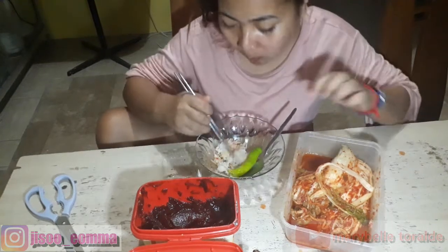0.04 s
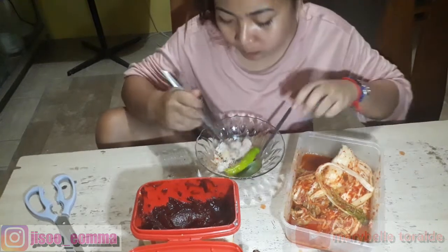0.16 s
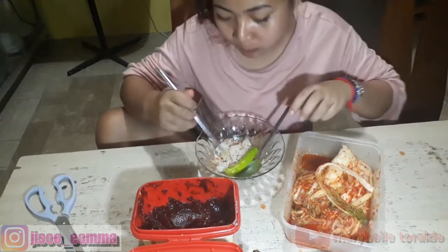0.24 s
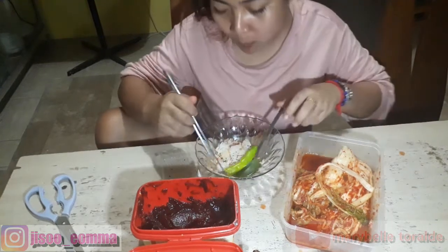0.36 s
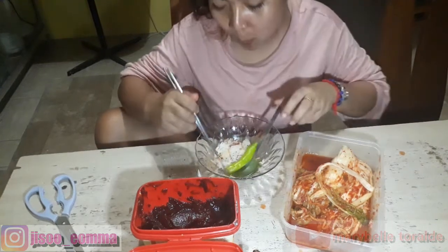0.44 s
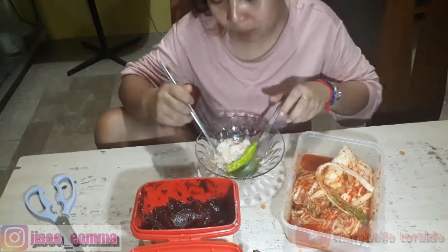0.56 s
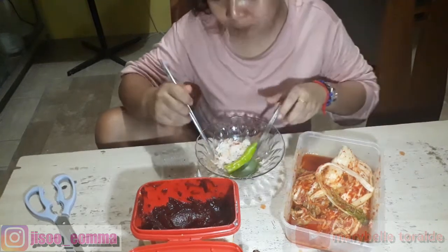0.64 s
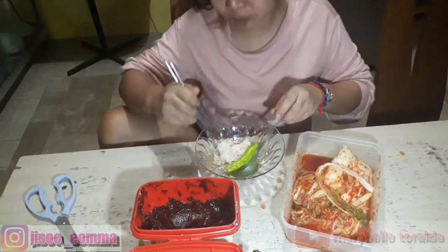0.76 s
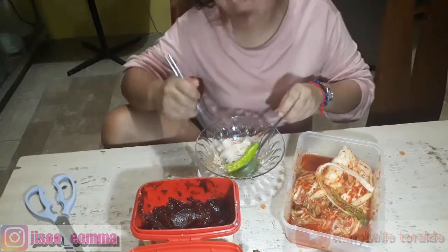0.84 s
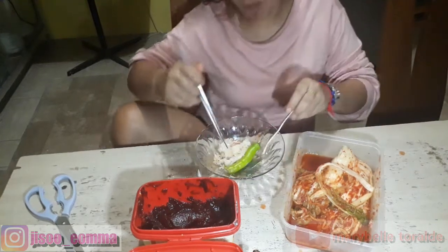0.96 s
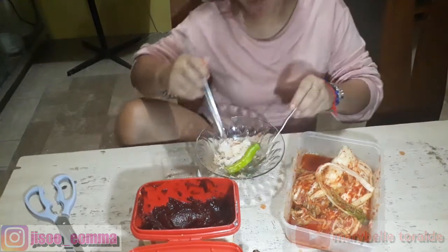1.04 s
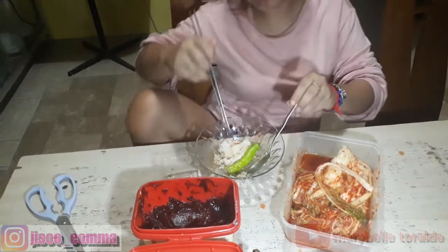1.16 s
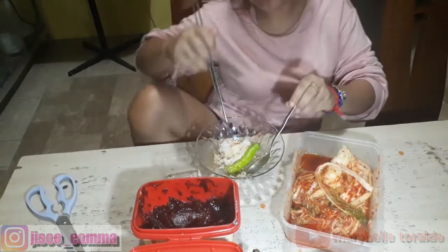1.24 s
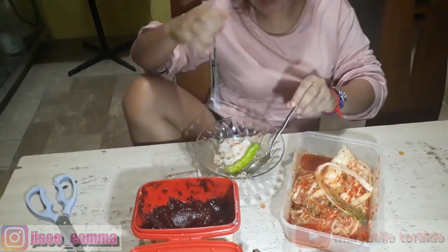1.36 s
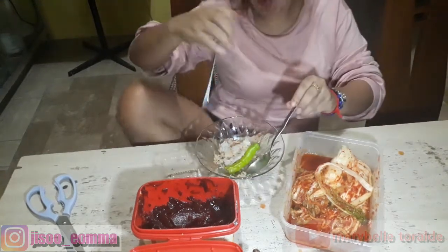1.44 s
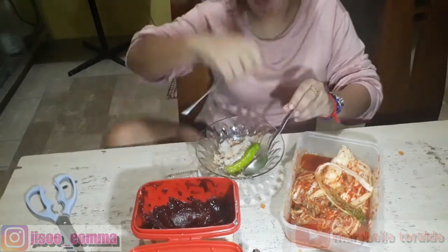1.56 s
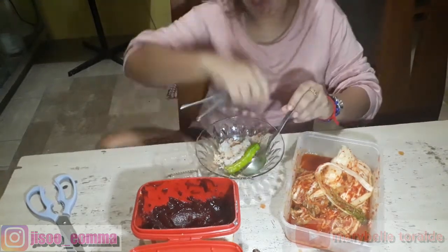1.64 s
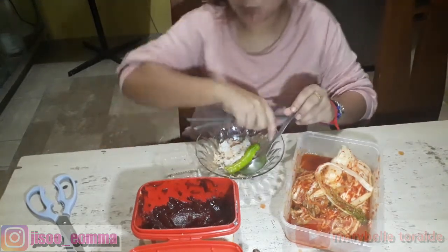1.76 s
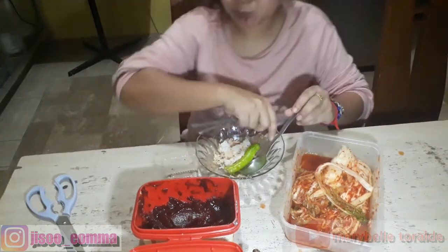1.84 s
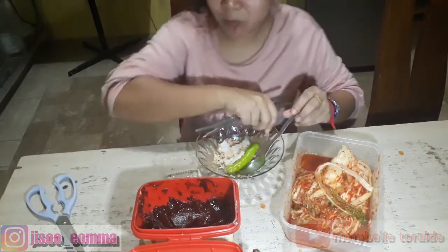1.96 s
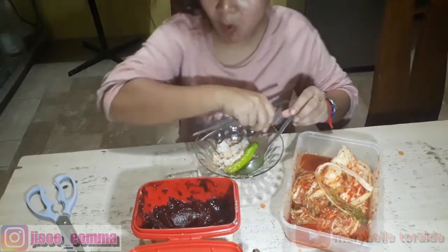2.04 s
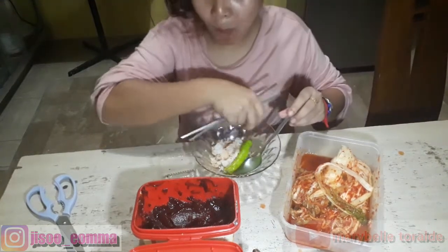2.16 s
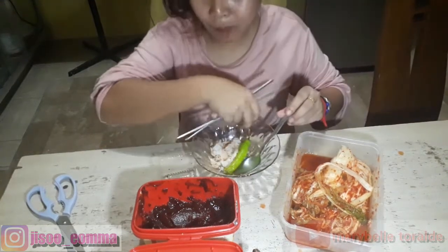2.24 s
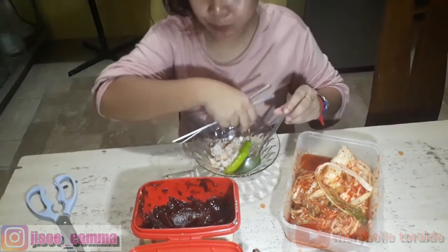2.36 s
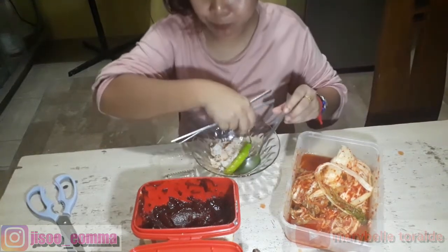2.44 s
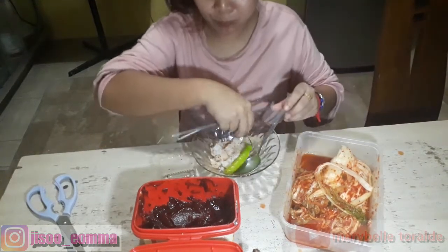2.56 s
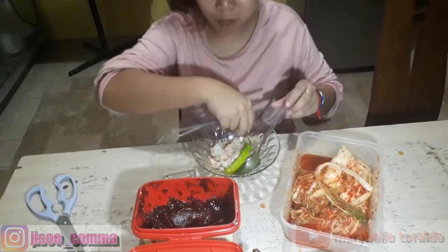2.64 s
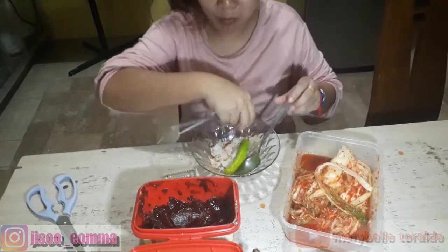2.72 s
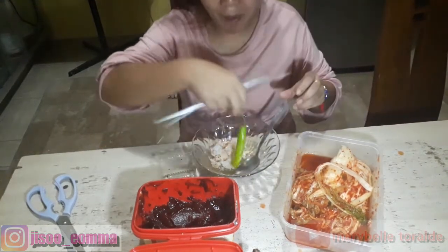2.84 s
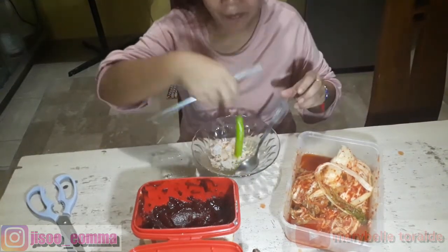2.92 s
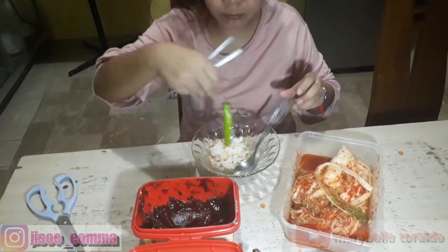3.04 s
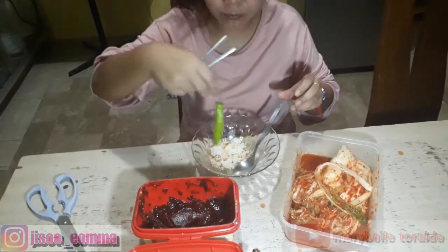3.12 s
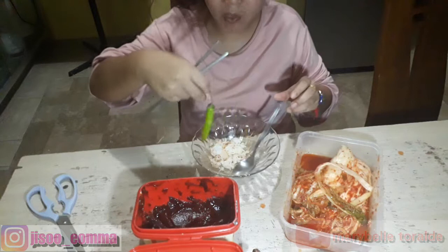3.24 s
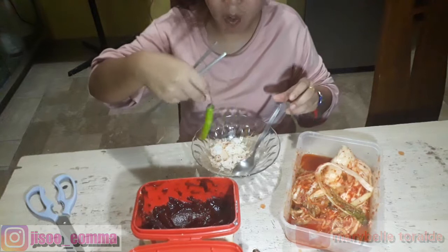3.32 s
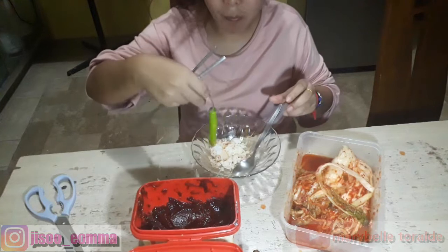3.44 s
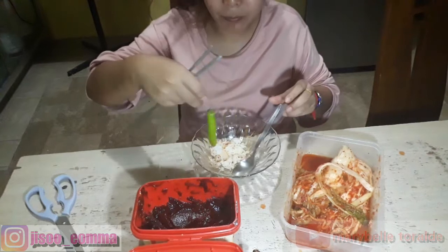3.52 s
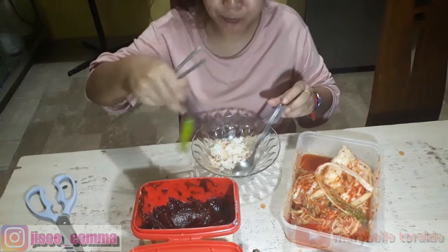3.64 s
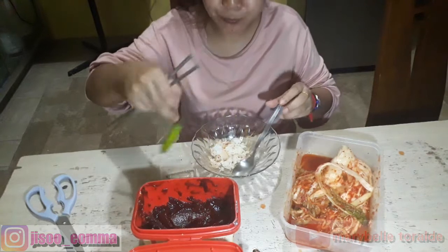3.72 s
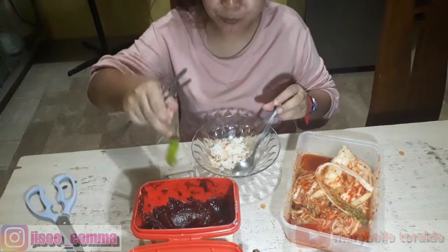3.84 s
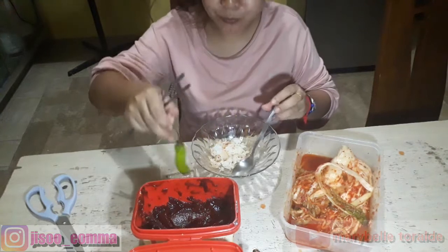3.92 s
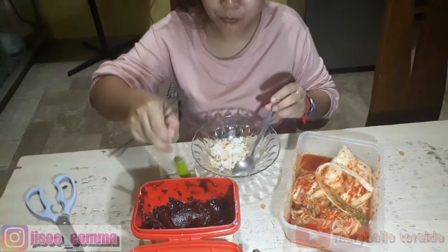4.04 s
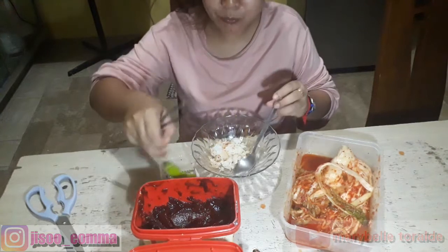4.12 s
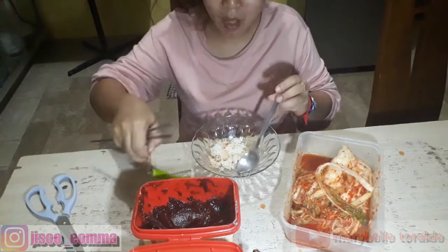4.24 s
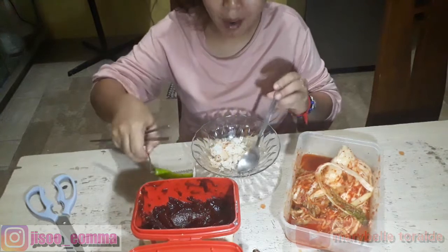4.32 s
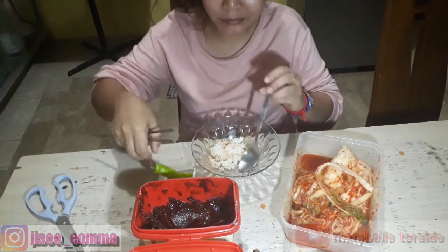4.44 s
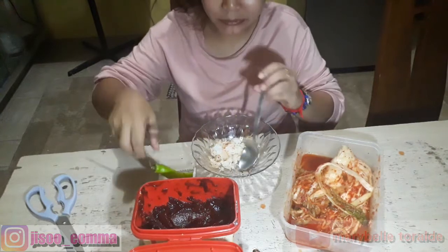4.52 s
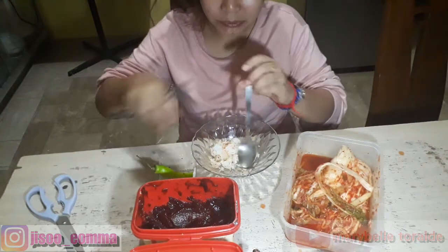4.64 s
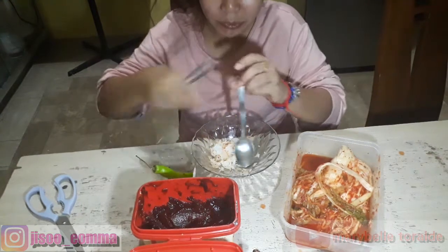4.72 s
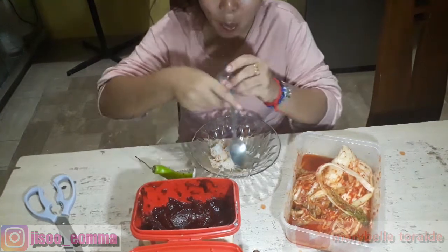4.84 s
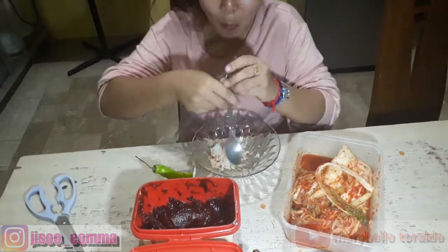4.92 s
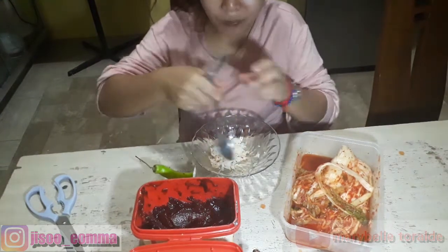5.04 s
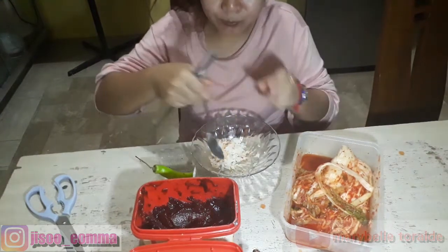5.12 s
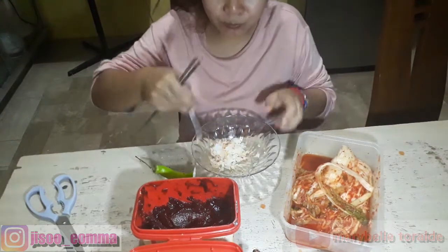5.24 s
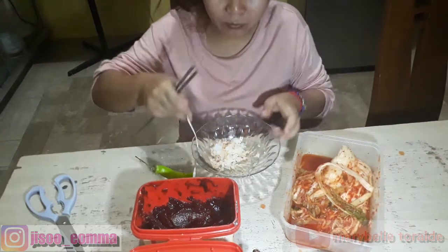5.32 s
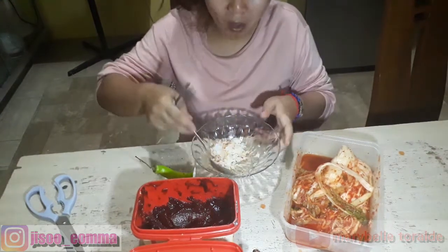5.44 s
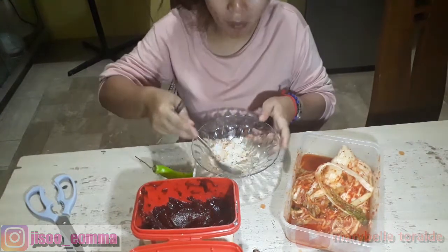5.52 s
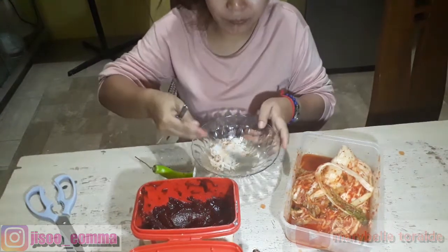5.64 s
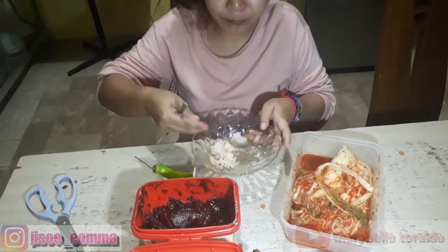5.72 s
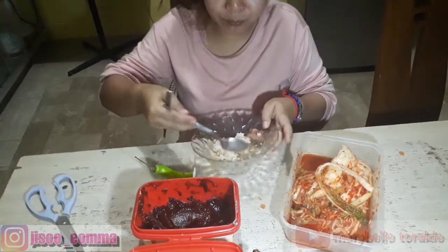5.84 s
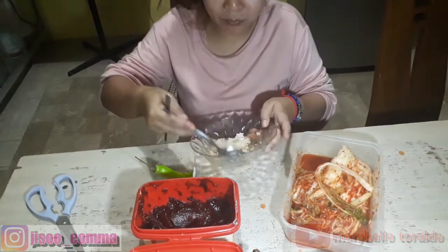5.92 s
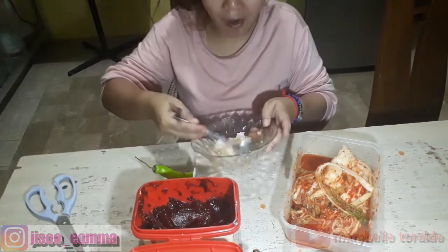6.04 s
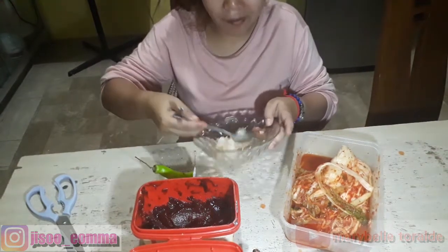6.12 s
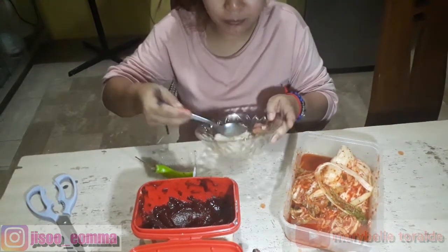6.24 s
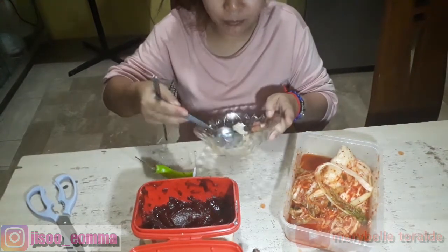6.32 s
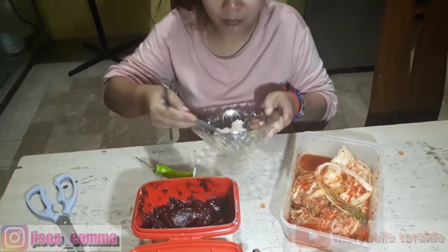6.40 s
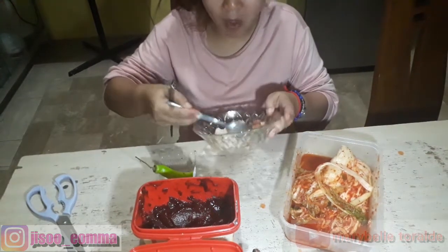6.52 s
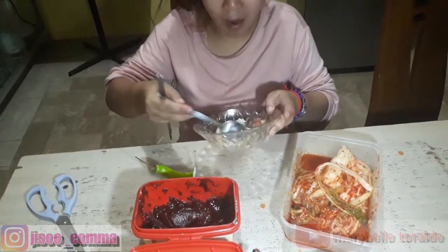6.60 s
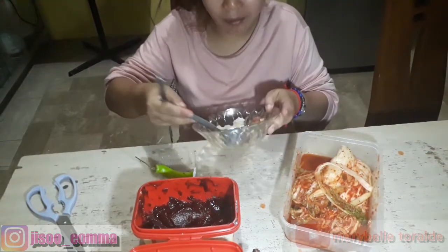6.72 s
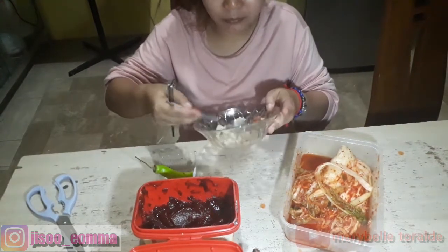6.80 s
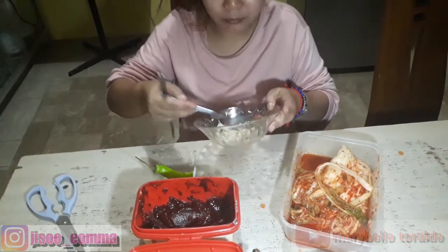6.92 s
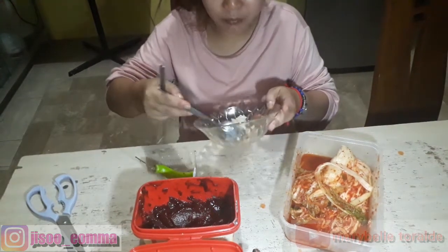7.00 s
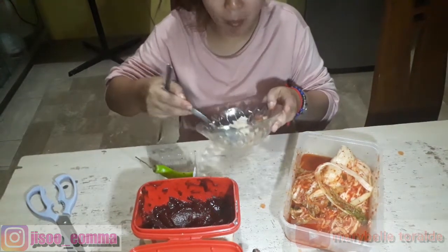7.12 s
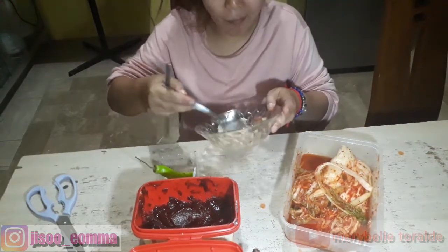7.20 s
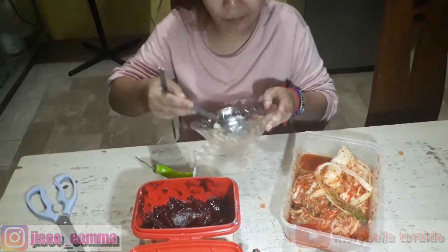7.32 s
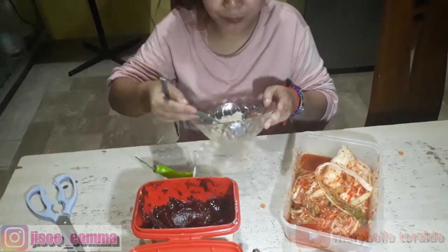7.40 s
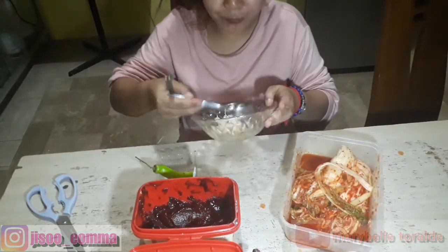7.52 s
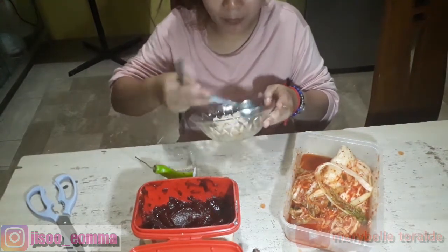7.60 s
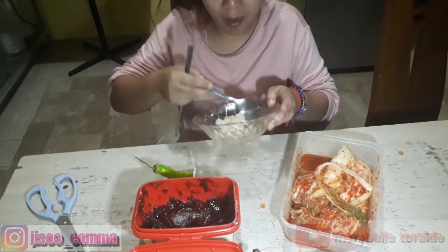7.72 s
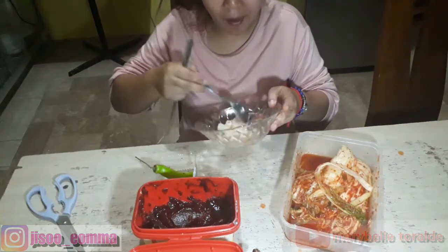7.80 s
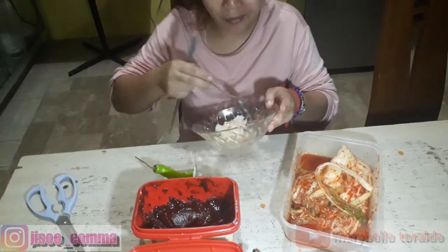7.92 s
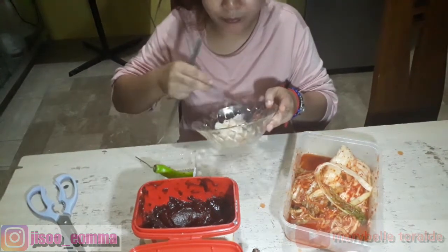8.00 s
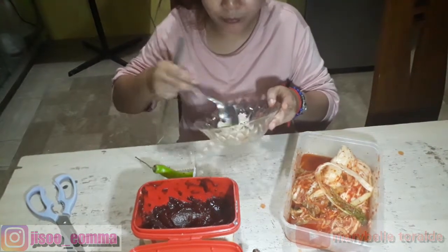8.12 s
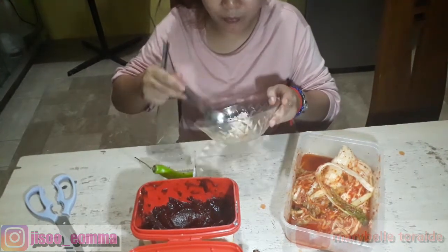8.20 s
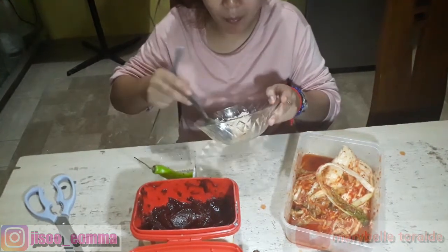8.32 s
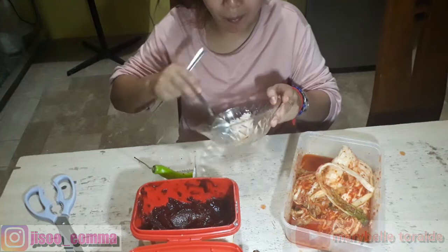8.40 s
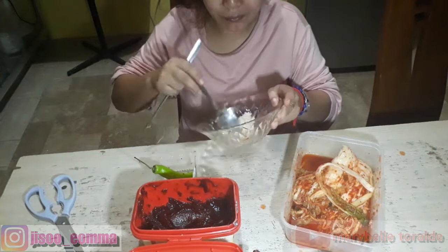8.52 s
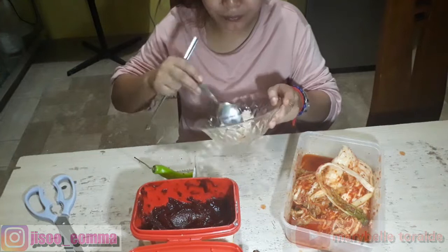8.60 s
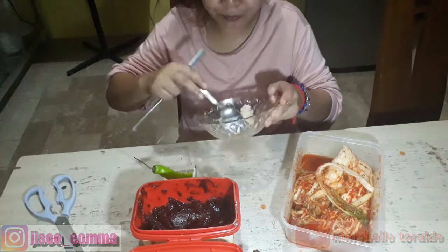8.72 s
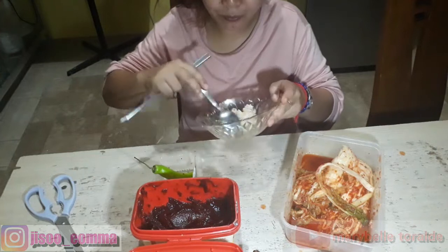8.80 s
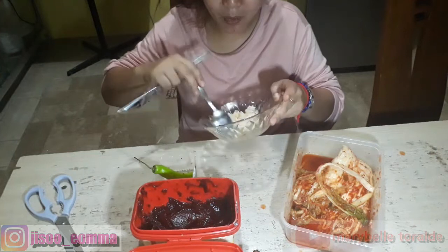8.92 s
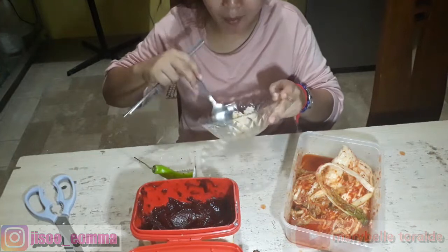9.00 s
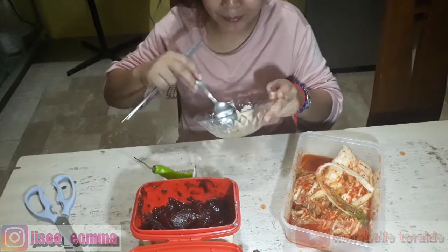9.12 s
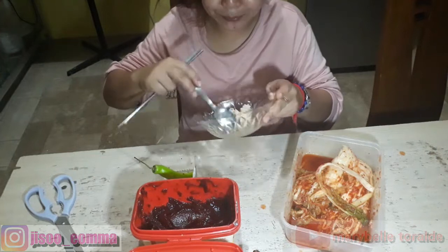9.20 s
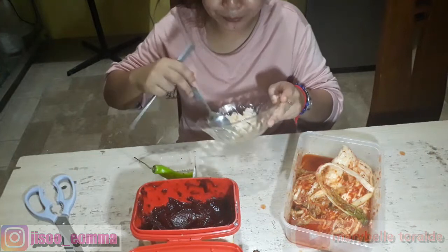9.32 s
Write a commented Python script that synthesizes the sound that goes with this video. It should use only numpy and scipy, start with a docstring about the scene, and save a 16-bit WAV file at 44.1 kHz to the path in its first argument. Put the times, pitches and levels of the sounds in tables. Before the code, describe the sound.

Close mono pickup of a meal in a small echoing room. Bright, damped clinks of steel utensils on glass open the scene, followed by a cluster of dull, grainy crunches and a quiet gap. Things bump down on the table, the glass bowl rings hard once, and spoon drags and taps continue, with one quick squeak late on. Broadband rush, low rumble and faint hum run throughout.

```python
"""Steel chopsticks and a spoon clink, drag and once squeal on a glass bowl, during a meal in a hard-walled room.
Between the clinks food crunches and things scuff on the table top, over a rush, a low rumble and a wavering hum.
Clinks are damped sines fed by short friction bursts; crunches and scuffs are dull grainy bursts with one resonance.
Squeal and whistles are unsteady gliding tones; rush and rumble are coloured noise."""
import sys
import numpy as np
from scipy import signal
from scipy.fft import rfft, irfft, next_fast_len
from scipy.io import wavfile
from scipy.ndimage import map_coordinates

SR = 44100
rng = np.random.default_rng(int(sys.argv[2]) if len(sys.argv) > 2 else 0)


def dump(signal):
    """Clip the signal to [-1, 1] and save it as 16-bit WAV at the path in sys.argv[1]."""
    limited = np.clip(np.atleast_2d(signal).T, -1, 1)
    pcm = np.round(limited * 32767).astype(np.int16)
    wavfile.write(sys.argv[1], SR, pcm)


N = 412335  # samples in the scene
RING = int(.65 * SR)  # samples each contact may ring
BLOW = int(.04 * SR)  # opening samples over which the level of a contact is set
TOP_HZ = 15600  # band limit of the recorder

# Colour of the even rush. Each row: frequency in Hz, relative density in dB per Hz.
RUSH_COLOUR = [(180, -27), (300, -17), (385, -2), (425, -3.5), (462, -4), (885, -5.5), (1030, -6.5),
               (2070, -9.5), (2650, -13.5), (4230, -22.5), (5250, -23), (5800, -26), (9390, -26),
               (15000, -37), (16000, -58)]
# Colour of the low rumble. Each row: frequency in Hz, relative density in dB per Hz.
RUMBLE_COLOUR = [(15, -65), (25, -30), (86, -8), (125, -2), (216, -5.5), (246, -4), (387, -12), (425, -32),
                 (600, -12), (780, -41), (1320, -120)]
# Arms and sleeves move and shift the background.
# Each row: middle in seconds, half length in seconds, rumble rise in dB, rush rise in dB.
MOVES = [(.01, 0.12, 7, 6), (.6, 0.48, 2.5, .5), (1.52, 0.24, -0.5, 6.5), (2.03, 0.19, 1.5, 3),
         (5.513, 0.31, 7, -0.5), (7.63, 0.55, 4.5, 1.5), (9.2, 0.45, 2.5, 0.5)]
# Low hum tones that come and go.
# Each row: start in seconds, end in seconds, mean pitch in Hz, level in dB before waver and hum trim.
HUMS = [(-.4, 2.96, 122, -49.5), (3.5, 11, 113.5, -52), (5.1, 8.4, 134.5, -46.5)]
HUM_FADE_S, HUM_FADE_DB = 0.29, 17

# Echo length of the room. Each row: frequency in Hz, time to lose 60 dB in seconds.
ROOM_DECAY = [(150, 0.32), (1000, 0.6), (4000, 0.5), (9000, 0.41), (15000, 0.32)]

# Modes of each object.
# Each row: frequency in Hz, relative level in dB, time to lose 60 dB in seconds before the sustain factor.
BOWL_MODES = [(650, -10, .09), (1416, -4, .3), (2476, -3, .33), (3735, -11, .28), (5078, -6, .45),
              (6470, -3.5, .26), (8066, -2, .27), (8335, -4, .27), (8430, -5, .25), (9567, -3, .2),
              (9768, -4, .17), (11076, -7, .2), (11400, -7, .2), (12780, -9, .16), (14190, -14, .16)]
SPOON_MODES = [(1085, -15, .12), (1480, -17, .1), (2000, -17, .1), (4700, -11, .25), (4765, -6, .3),
               (4810, -4, .3), (4885, -9, .25), (4960, -8, .3), (7752, -2, .25), (7935, -6, .2),
               (8505, -3, .2), (10700, -8, .15), (11080, -7, .15), (12100, -11, .2), (12915, -4, .2),
               (13160, -7, .17), (14200, -5, .16), (15270, -8, .15)]
CHOPSTICK_MODES = [(3745, -13, .33), (6480, -11, .2), (7345, -2, .22), (7560, -7, .3), (8530, -6, .3),
                   (8680, -4, .28), (8900, -7, .22), (9990, -10, .12), (11100, -4, .25), (11470, -5, .2),
                   (11660, -4, .22), (13800, -11, .16), (15300, -6, .15)]
TABLE_MODES = [(142, -13, 0.24), (236, 4, 0.1), (346, 5, 0.13), (388, -1.5, 0.24)]

# Register borders for the ringing contacts. Each entry: frequency in Hz.
CLINK_EDGES = [330, 1200, 3100, 4300, 5800, 7000, 10300, 15500]
# Four kinds of ringing contact. Each row: start in seconds, drag time constant in seconds, favoured mode in Hz,
# level in dB before its colour, brightness in dB per kHz, bowl's share in dB.
BOWL_STRIKES = [(5.3258, 0.00046, 6470, -22.5, 0.5, 5), (5.348, 0.0016, 6470, -31.5, 1, -12),
                (7.039, 0.0014, 9650, -39.5, -0.74, -11), (8.2903, 0.001, 9570, -32.5, -0.47, -3)]
SPOON_TAPS = [(.037, 0.00093, 7300, -30, 0.052, -15), (1.079, 0.00094, 11100, -60, -1.8, -9),
              (4.704, 0.00076, 8550, -49, -0.66, -4), (5.02, 0.0013, 15300, -41.5, 0.28, -16),
              (7.388, 0.0022, 11000, -36, -0.36, -5), (7.891, 0.0019, 8500, -56.5, -0.8, 3),
              (8.032, 0.0029, 7800, -33.5, -0.024, -1.5), (8.7474, 0.0022, 8500, -40, -0.015, -12),
              (9.22, .0013, 8500, -36, -0.022, -10)]
SPOON_DRAGS = [(.001, 0.0084, 4920, -40, 0.71, 6), (5.59, 0.0092, 13200, -46, -.2, -4),
               (5.675, 0.0074, 8080, -51, 0.1, -18), (6.056, 0.04, 12900, -50.5, 0.12, -11),
               (6.088, 0.012, 12900, -48, 0.41, -3), (6.806, 0.0042, 4860, -51.5, -0.11, -22),
               (7.098, 0.0048, 4930, -42.5, 0.09, -28), (7.321, 0.004, 12500, -59.5, 0.58, 6),
               (8.444, 0.0059, 4870, -44.5, -0.38, -12), (9.294, 0.0036, 4960, -34.5, -0.13, -8)]
CHOPSTICK_CLICKS = [(.383, 0.00038, 11100, -37, 0.56, -17), (.735, 0.0028, 15300, -42.5, .3, -12),
                    (2.186, 0.001, 6470, -38.5, -0.074, 0), (2.457, 0.011, 6450, -40.5, -0.16, -8.5),
                    (7.656, 0.00034, 8900, -37, -0.52, -7)]
# Voice of each kind. First group: spoon share in dB, chopstick share in dB, crack in dB,
# lift round the favoured mode in dB. Second group: colour in dB for each register of CLINK_EDGES.
STRIKE_VOICE = (-20.5, -7.5, 25, 11), (-7.5, 1.5, -8, -6.5, -8, -1.5, -4)
TAP_VOICE = (-1.5, -4, 35, 5.5), (-6, -4.5, -7.5, -1.5, -12, 0.5, 2.5)
DRAG_VOICE = (4, -21.5, 31.5, 3.5), (0, 2, -7.5, 2.5, -19, 3, 0.5)
CLICK_VOICE = (-14, 0.5, 23.5, 8.5), (-10.5, -5.5, -5, -10, -15.5, -0.5, 3)
FOCUS_OCTAVES = 0.53  # width of the lift round a favoured mode or resonance

# The table top booms under the heavier knocks. Each row: start in seconds, level in dB.
KNOCKS = [(0.038, -38), (.385, -43), (.768, -43), (4.235, -39), (5.334, -31), (5.549, -33.5)]

# Register borders for crunches and scuffs. Each entry: frequency in Hz.
SCUFF_EDGES = [150, 550, 1200, 3700, 7000, 15500]
# Crisp food breaks. Each row: start in seconds, drag time constant in seconds, resonance in Hz,
# level in dB before colour and layer trim, brightness in dB per octave.
CRUNCHES = [(1.336, 0.0088, 2300, -26.5, -0.5), (1.378, 0.0028, 1650, -28.5, 1.6),
            (1.473, 0.0066, 1590, -36, -2.5), (1.544, 0.0058, 2180, -34, 0.5),
            (1.611, 0.01, 1500, -34.5, 4), (1.751, 0.0066, 1550, -35.5, -2.7),
            (1.868, 0.01, 1700, -30, 2.5), (1.904, 0.0088, 1500, -35, -2.5),
            (1.976, .0035, 1500, -36.5, -2.5), (2.031, 0.0055, 1460, -39.5, -1),
            (2.111, 0.0069, 1500, -29, -1.5), (2.774, 0.0054, 3230, -40, 2.7)]
# Things shift on the table top. Each row: start in seconds, drag time constant in seconds, resonance in Hz,
# level in dB before colour and layer trim, brightness in dB per octave.
SHOVES = [(0.864, 0.0066, 760, -42.5, -3.5), (4.213, 0.0089, 700, -36.5, 1.5),
          (4.234, 0.0026, 600, -34.5, 0), (4.272, .0018, 1960, -38, 3), (4.292, 0.0028, 1880, -30, 1.5),
          (4.334, 0.0037, 450, -38.5, 1), (5.487, 0.011, 1000, -33, -1), (5.523, 0.011, 865, -33, -0.3),
          (6.43, 0.00041, 830, -37, 2.5), (8.868, 0.015, 933, -42.5, 0.8), (8.928, 0.007, 930, -36, 2)]
# Moist ticks and light rustles of food. Each row: start in seconds, drag time constant in seconds,
# resonance in Hz, level in dB before colour and layer trim.
TICKS = [(0.892, 0.0023, 9200, -40.5), (1.187, 0.0099, 2000, -51), (1.251, 0.084, 9750, -52.5),
         (2.062, 0.0031, 3980, -42.5), (2.82, .002, 3100, -59), (3.257, 0.0064, 9800, -49.5),
         (4.047, .0048, 3780, -50.5), (5.982, .0051, 3934, -45.5), (6.003, 0.00063, 9300, -47),
         (6.471, 0.0035, 3470, -41), (6.49, 0.0021, 3400, -36.5), (6.72, 0.0018, 12000, -53.5),
         (7.739, 0.003, 1500, -45), (8.964, 0.00086, 2600, -39.5)]
# Colour of each kind of scuff. Each entry: dB for one register of SCUFF_EDGES.
CRUNCH_COLOUR = (-16.5, -10, 1, -14, -10)
SHOVE_COLOUR = (-4, -0.5, -2.5, -20, -14)
TICK_COLOUR = (-15, -7, -2, -5, -2.5)
TICK_LIFT_DB = 5.5  # lift round the resonance of a tick

# A faint falling whistle. Each row: time in seconds, pitch in Hz before jitter, level in dB before the room.
WHISTLE = [(3.93, 2930, -70), (3.98, 2850, -53), (4.07, 2680, -53), (4.15, 2490, -56), (4.21, 2330, -64)]
# The spoon sticks and slips on the glass.
# Each row: time in seconds, pitch in Hz before jitter, level in dB before squeal trim and room.
SQUEAL = [(7.765, 2720, -66), (7.773, 2620, -32), (7.783, 2640, -35), (7.791, 2510, -27),
          (7.803, 2526, -38), (7.825, 2600, -48), (7.85, 2420, -73)]
# A second, lower whistle that barely sounds.
# Each row: time in seconds, pitch in Hz before jitter, level in dB before the room.
LOW_WHISTLE = [(7.85, 1850, -65), (7.95, 1836, -50), (8.2, 1858, -57), (8.42, 1943, -46), (8.52, 1860, -50),
               (8.7, 1860, -70)]


def amp(db):
    """Decibels to gain."""
    return 10 ** (np.asarray(db) / 20)


def unit(x):
    """x at rms 1."""
    return x / np.sqrt(np.mean(x ** 2) + 1e-20)


def along(points, hz):
    """(Hz, value) points read on a log frequency axis."""
    f, v = np.transpose(points)
    return np.interp(np.log(hz + 1), np.log(f + 1), v)


def curves(rows):
    """One value per sample for each column after the time."""
    s, *cols = np.transpose(rows)
    return [np.interp(np.arange(N) / SR, s, c) for c in cols]


def wobble(rate):
    """A smooth random curve with rate knots a second."""
    knots = rng.standard_normal(int(N * rate / SR) + 4)
    return map_coordinates(knots, [np.arange(N) * rate / SR])


def filtered(x, response):
    """x times a response of frequency."""
    m = next_fast_len(N + SR // 2)
    return irfft(rfft(x, m) * response(np.fft.rfftfreq(m, 1 / SR)), m)[:N]


def fade(t, t60):
    """Decay that loses 60 dB in t60 seconds."""
    return np.exp(-np.log(1000) * t / t60)


def add(track, s, sound):
    """Lay a sound into the track at time s."""
    start = round(s * SR)
    track[start:start + len(sound)] += sound[:N - start]


def rush(spectrum):
    """Noise of rms 1 with the given colour."""
    return unit(filtered(rng.standard_normal(N), lambda hz: amp(along(spectrum, hz))))


def tone(rows, overtones_db, jitter, jitter_rate):
    """A slightly unsteady pitched tone: its phase sums the (s, Hz, dB) pitch curve with random jitter."""
    hz, db = curves(rows)
    phase = 2 * np.pi * np.cumsum(hz * (1 + jitter * wobble(jitter_rate))) / SR
    wave = sum(amp(level) * np.sin(k * phase) for k, level in enumerate(overtones_db, 1))
    t = np.arange(N) / SR
    sounding = (t >= rows[0][0]) & (t <= rows[-1][0])
    return amp(db) * unit(wave) * sounding


def hum(waver_db=3):
    """Each low sine swells up, wavers in pitch and level, and sinks before it stops."""
    track = np.zeros(N)
    for start, end, hz, db in HUMS:
        quiet_db = db - HUM_FADE_DB
        full_from, full_to = start + HUM_FADE_S, end - HUM_FADE_S
        shape = [(start, hz, quiet_db), (full_from, hz, db), (full_to, hz, db), (end, hz, quiet_db)]
        track += tone(shape, [0], jitter=0.0266, jitter_rate=21) * amp(waver_db * wobble(14))
    return track


def background(rumble_db=-48.0, rush_db=-45.0, hum_db=-2.0):
    """Coloured noises make a low rumble and an even rush; both shift with each movement, over the hum."""
    t = np.arange(N) / SR
    low_db = rumble_db
    high_db = rush_db + .5 * wobble(15)
    for middle, half_length, rumble_rise_db, rush_rise_db in MOVES:
        swell = np.exp(-((t - middle) / half_length) ** 2)
        low_db = low_db + rumble_rise_db * swell
        high_db = high_db + rush_rise_db * swell
    return amp(low_db) * rush(RUMBLE_COLOUR) + amp(high_db) * rush(RUSH_COLOUR) + amp(hum_db) * hum()


def room(wet_db, build=0.0014):
    """The direct sound, then a diffuse noise tail that builds fast and decays at its own pace at each pitch."""
    hz, t, z = signal.stft(rng.standard_normal(RING), SR, nperseg=256)
    decaying = z * fade(t, along(ROOM_DECAY, hz)[:, None])
    tail = signal.istft(decaying, SR, nperseg=256)[1][:RING]
    tail *= 1 - np.exp(-np.arange(RING) / SR / build)
    response = amp(wet_db) * tail / np.linalg.norm(tail)
    response[0] += 1
    return response


def band_filters(edges):
    """One band-pass between each two edges."""
    return [signal.butter(5, pair, "band", fs=SR, output="sos") for pair in zip(edges, edges[1:])]


def centres(edges):
    """The middle frequency of each register."""
    return np.sqrt(np.multiply(edges[:-1], edges[1:]))


def lift(edges, hz):
    """How near each register lies to a frequency, 0-1."""
    return np.exp(-(np.log2(centres(edges) / hz) / FOCUS_OCTAVES) ** 2)


def voiced(sound, filters, levels_db):
    """Place and hardness of a contact set how loud each register starts."""
    bands = [signal.sosfilt(sos, sound) for sos in filters]
    return sum(amp(db) * band / np.sqrt(np.mean(band[:BLOW] ** 2) + 1e-20) for band, db in zip(bands, levels_db))


def friction(drag, spiky_db, swell=0.82):
    """Contact force: a burst of tiny slips of uneven size that swells and dies over the drag time."""
    u = np.arange(RING // 2) / SR / drag
    slips = np.repeat(rng.standard_normal(len(u)), repeats=16)[:len(u)]  # each slip lasts 16 samples
    force = rng.standard_normal(len(u)) * amp(spiky_db * slips) * u ** swell * np.exp(-u)
    return force / np.linalg.norm(force)


def struck(modes, favoured_hz, detune, favour_db=7, favour_octaves=0.024, scatter_db=1, sustain=0.72):
    """Damped sines of one object: the point of contact favours some modes, and the grip detunes them slightly."""
    hz, db, t60 = np.transpose(modes)
    nearness = np.exp(-(np.log2(hz / favoured_hz) / favour_octaves) ** 2)
    gains = amp(db + favour_db * nearness + scatter_db * rng.standard_normal(len(hz)))
    hz = hz * (1 + detune * rng.standard_normal(len(hz)))
    t = np.arange(RING, dtype=np.float32) / SR
    turn, loss = np.float32([2 * np.pi * hz, np.log(1000) / (sustain * t60)])[:, :, None]
    return np.float32(gains) @ (np.sin(turn * t) * np.exp(-loss * t))


def contact_colour(favoured_hz, brightness, lift_db, pivot_hz=7000):
    """dB per register: a harder contact is brighter, and its place lifts the registers round one mode."""
    khz_above = (centres(CLINK_EDGES) - pivot_hz) / 1000
    return brightness * khz_above + lift_db * lift(CLINK_EDGES, favoured_hz)


def clinks(chatter_db=-1, chatter_t60=0.053):
    """Each contact rings the modes of bowl, spoon and chopsticks in the shares of its kind."""
    filters, track, t = band_filters(CLINK_EDGES), np.zeros(N), np.arange(RING) / SR
    kinds = [(BOWL_STRIKES, STRIKE_VOICE), (SPOON_TAPS, TAP_VOICE),
             (SPOON_DRAGS, DRAG_VOICE), (CHOPSTICK_CLICKS, CLICK_VOICE)]
    for contacts, ((spoon_db, sticks_db, crack_db, lift_db), colour_db) in kinds:
        for s, drag, favoured_hz, db, brightness, bowl_db in contacts:
            ring = amp(bowl_db) * struck(BOWL_MODES, favoured_hz, detune=0.00058)
            ring += amp(spoon_db) * struck(SPOON_MODES, favoured_hz, detune=0.0034)
            ring += amp(sticks_db) * struck(CHOPSTICK_MODES, favoured_hz, detune=0.0021)
            # a longer drag feeds the ring more slowly
            ring *= 1 - np.exp(-t / drag)
            # while the pieces still touch they chatter: the same modes, heavily damped
            touch = friction(drag, spiky_db=4.5)
            chatter = signal.fftconvolve(ring * fade(t, chatter_t60), touch)[:RING]
            attack = amp(chatter_db) * np.linalg.norm(ring) * chatter / np.linalg.norm(chatter)
            attack[:len(touch)] += amp(crack_db) * touch
            # the free ring arrives mostly direct, while the attack splashes round the room
            heard = signal.fftconvolve(ring, room(wet_db=-7))[:RING]
            heard += signal.fftconvolve(attack, room(wet_db=0))[:RING]
            levels_db = db + contact_colour(favoured_hz, brightness, lift_db) + colour_db
            add(track, s, voiced(heard, filters, levels_db))
    return track


def knocks(rise=0.0088):
    """The table top answers slowly and low: damped sines with a soft onset."""
    track, t = np.zeros(N), np.arange(RING) / SR
    for s, db in KNOCKS:
        boom = struck(TABLE_MODES, favoured_hz=379.7, detune=0.018) * (1 - np.exp(-t / rise))
        heard = signal.fftconvolve(boom, room(wet_db=-3))[:RING]
        add(track, s, amp(db) * heard / np.std(heard[:BLOW]))
    return track


def scuffs(sharpness=3, resonance_db=4, soft_hz=9500, pivot_hz=2000, level_db=-1.5):
    """Food and soft things give only a dull grainy burst with one broad resonance, which the room draws out."""
    filters, track = band_filters(SCUFF_EDGES), np.zeros(N)
    softness = signal.butter(2, soft_hz, fs=SR, output="sos")
    octaves = np.log2(centres(SCUFF_EDGES) / pivot_hz)
    bursts = []
    for rows, colour_db in [(CRUNCHES, CRUNCH_COLOUR), (SHOVES, SHOVE_COLOUR)]:
        for s, drag, hz, db, brightness in rows:
            bursts.append((s, drag, hz, db + brightness * octaves + colour_db))
    for s, drag, hz, db in TICKS:
        bursts.append((s, drag, hz, db + TICK_LIFT_DB * lift(SCUFF_EDGES, hz) + TICK_COLOUR))
    for s, drag, centre_hz, levels_db in bursts:
        burst = signal.sosfilt(softness, friction(drag, spiky_db=4, swell=1))
        resonance = signal.lfilter(*signal.iirpeak(centre_hz, sharpness, SR), burst)
        burst = burst + amp(resonance_db) * resonance
        heard = signal.fftconvolve(burst, room(wet_db=0))[:RING]
        add(track, s, voiced(heard, filters, levels_db))
    return amp(level_db) * track


def squeaks(squeal_db=1):
    """The faint whistles are jittery sines and the spoon's squeal adds two overtones; all echo in the room."""
    whistles = sum(tone(rows, [0], jitter=0.0053, jitter_rate=57) for rows in (WHISTLE, LOW_WHISTLE))
    squeal = tone(SQUEAL, [0, -13, -10], jitter=0.0059, jitter_rate=230)
    echoing_whistles = signal.fftconvolve(whistles, room(wet_db=-8))[:N]
    echoing_squeal = signal.fftconvolve(squeal, room(wet_db=0))[:N]
    return echoing_whistles + amp(squeal_db) * echoing_squeal


def scene():
    """All layers sum to one channel."""
    return (background() + clinks() + knocks() + scuffs() + squeaks())[None]


def record(dry):
    """The recorder clips at full scale and keeps nothing above its band limit."""
    return filtered(np.clip(dry[0], -1, 1), lambda hz: hz < TOP_HZ)[None]


dry = scene()
out = record(dry)
dump(out)
```